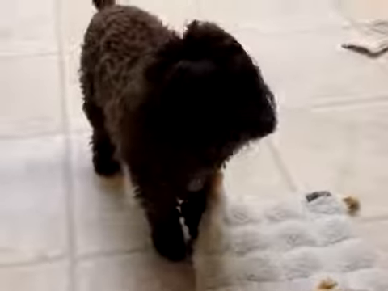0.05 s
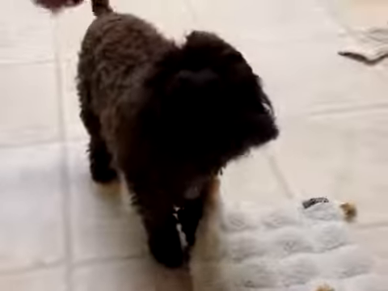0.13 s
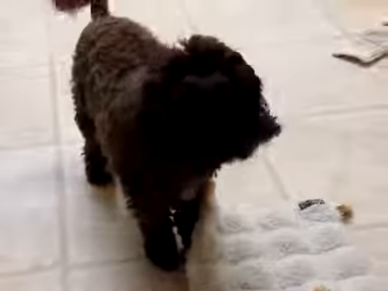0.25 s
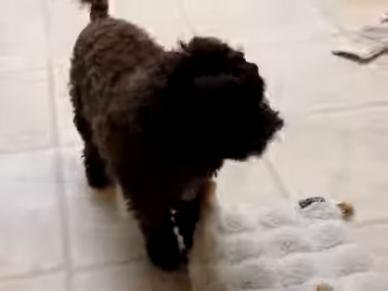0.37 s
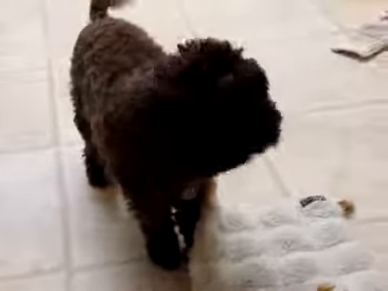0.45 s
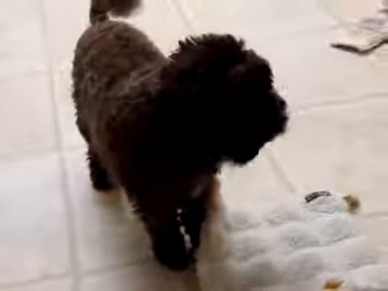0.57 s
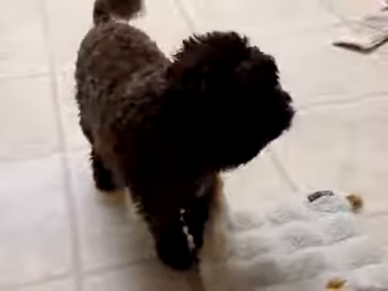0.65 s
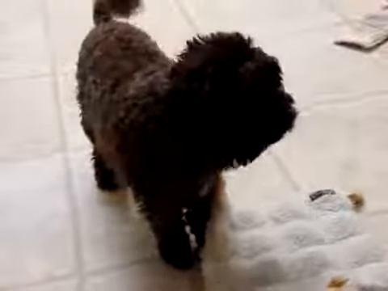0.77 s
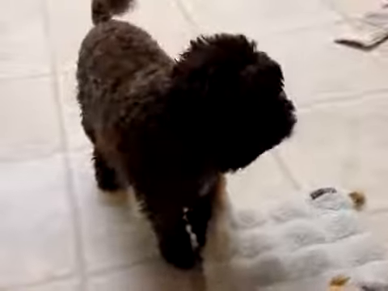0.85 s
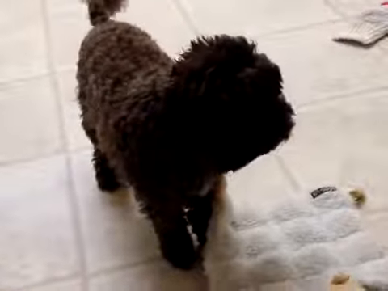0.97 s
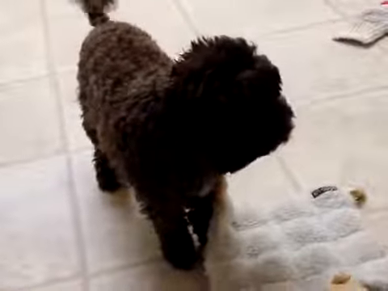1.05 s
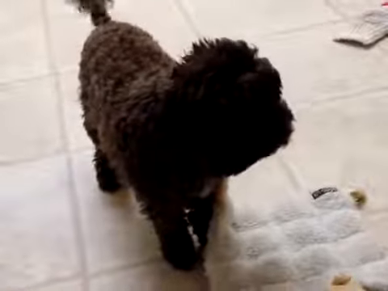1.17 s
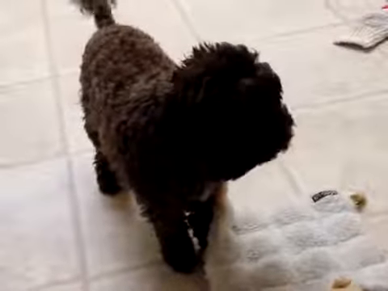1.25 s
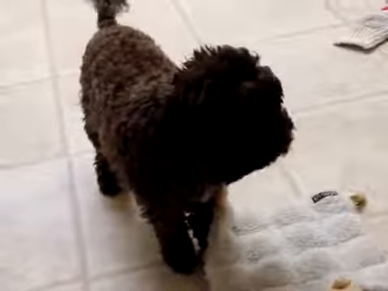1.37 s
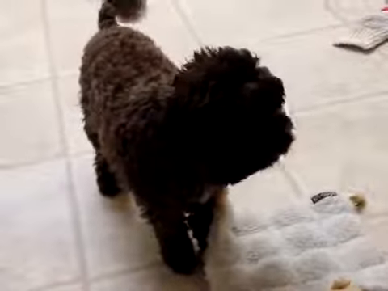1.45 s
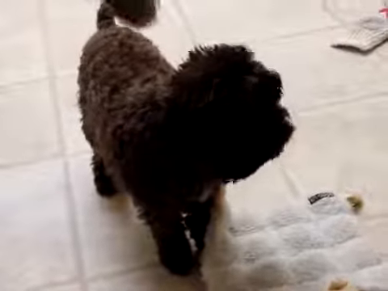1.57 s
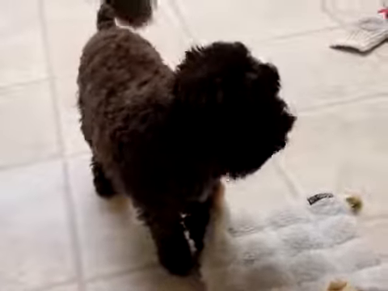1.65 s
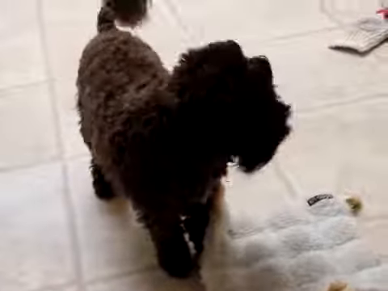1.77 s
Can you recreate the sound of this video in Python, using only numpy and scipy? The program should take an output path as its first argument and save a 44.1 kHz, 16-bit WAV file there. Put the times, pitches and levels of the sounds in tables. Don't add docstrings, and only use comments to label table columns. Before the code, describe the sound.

A small dog pounces on a hard tiled floor, paws thudding, claws knocking and a loose dish ringing, with sharp snaps close to the microphone.

```python
import sys
import numpy as np
from scipy import signal
from scipy.fft import rfft, irfft
from scipy.io import wavfile
from scipy.ndimage import uniform_filter1d

SR = 44100
rng = np.random.default_rng(int(sys.argv[2]) if len(sys.argv) > 2 else 0)


def amplitude_ratio(level_db):
    exponent = np.asarray(level_db, float) / 20
    return 10 ** exponent


def unload_audio(sound):
    columns = np.transpose(np.atleast_2d(sound))
    steps = np.round(np.clip(columns, -1, 1) * 32767)
    wavfile.write(sys.argv[1], SR, steps.astype(np.int16))


N = 288414


def at_hz(points, hz):
    point_hz, level_db = np.array(points)[:, 0], np.array(points)[:, 1]
    return np.interp(np.log(hz + 1), np.log(point_hz), level_db)


def colour(x, points):
    log_gain = at_hz(points, np.fft.rfftfreq(4096, 1 / SR)) * np.log(10) / 20
    cepstrum = irfft(log_gain)
    cepstrum[1:2048] *= 2
    cepstrum[2049:] = 0
    kernel = irfft(np.exp(rfft(cepstrum)))[:2048]
    return signal.fftconvolve(x, kernel / np.sqrt(np.sum(kernel ** 2)))[:N]


def noise(points):
    return colour(rng.standard_normal(N), points)


def marks(times, db):
    out = np.zeros(N)
    np.add.at(out, (np.asarray(times) * SR).astype(int), amplitude_ratio(db))
    return out


def ring(clicks, hz, t60):
    decay, turn = amplitude_ratio(-60 / (t60 * SR)), 2 * np.pi * hz / SR
    feedback = [1, -2 * decay * np.cos(turn), decay * decay]
    return signal.lfilter([0, np.sin(turn)], feedback, clicks + 1e-18)


def struck(times, db, modes, spread_db, swell_s):
    luck = rng.standard_normal((len(times), len(modes)))
    out = 0
    for k, (hz, level_db, t60) in enumerate(modes):
        clicks = marks(times, db + level_db + spread_db * luck[:, k])
        out = out + ring(clicks, hz, t60) - ring(clicks, hz, swell_s)
    return out


def waver(rate_hz, depth_db):
    points = rng.standard_normal(400)
    return amplitude_ratio(depth_db * np.interp(np.arange(N) / SR * rate_hz, np.arange(400), points))


# (pitch_hz [Hz], t60_s [s])
ROOM_DECAY = [(100, 0.66), (260, 0.45), (700, 0.37), (1840, 0.38), (4850, 0.37), (12000, 0.21)]


def room(x, build_s, clump_db):
    t = np.arange(30000) / SR
    edges = 50 * 2 ** np.arange(0, 8.6, .5)
    early = 1 + 0.42 * np.exp(-t / 0.012)
    walls = rng.standard_normal(120)
    echo = 0
    for low, high in zip(edges, edges[1:]):
        band_filter = signal.butter(2, [low, high], "band", fs=SR, output="sos")
        band = signal.sosfilt(band_filter, rng.standard_normal(len(t)))
        clumps = np.interp(t * 140, np.arange(120), .5 * walls + rng.standard_normal(120))
        t60 = at_hz(ROOM_DECAY, np.sqrt(low * high))
        echo = echo + band * amplitude_ratio(clump_db * clumps - 60 * t / t60) / np.sqrt(t60 * SR)
    return signal.fftconvolve(x, echo * (1 - np.exp(-t / build_s)) * early)[:N]


# (start_s [s], hiss_db while open [dB], hold_s [s], overshoot_db [dB])
OPENINGS = [(0.0, -53, 0.057, -3), (0.29, -50.5, 0.11, 9), (0.611, -58, 0.17, 10), (0.96, -55.5, 0.16, 2.5),
            (1.303, -51.5, 0.11, 15.5), (1.676, -55.5, 0.12, 3), (2.049, -56, 0.092, 2),
            (2.419, -54, 0.13, 0), (2.735, -51.5, 0.086, 7.5), (3.005, -51.5, 0.088, 11),
            (3.217, -51.5, 0.032, 13), (3.386, -62, 0.18, 1), (3.768, -58.5, 0.12, 2.5),
            (4.119, -53, 0.1, -10.5), (4.462, -51, 0.1, 10.5), (4.804, -62, 0.023, -1),
            (4.922, -63.5, 0.2, -2), (5.29, -51, 0.044, -4), (5.582, -52, .12, 0.5),
            (5.894, -53.5, 0.093, 7), (6.206, -55.5, 0.17, 3)]


def gate():
    overshoot_s, closing_db_per_s, ajar_db, sinking_db_per_s, shut_db = .02, 110, -11, 20, -73
    dip_db, dip_s = -2.5, 0.0052
    t = np.arange(N) / SR
    start_s, open_db, hold_s, over_db = np.transpose(OPENINGS)
    k = np.maximum(np.searchsorted(start_s, t, side="right") - 1, 0)
    since = t - start_s[k]
    after = np.maximum(since - hold_s[k], 0)
    closing = amplitude_ratio(-closing_db_per_s * after) + amplitude_ratio(ajar_db - sinking_db_per_s * after)
    closing_db = 20 * np.log10(closing / (1 + amplitude_ratio(ajar_db)))
    level = open_db[k] + over_db[k] * np.exp(-since / overshoot_s) + closing_db
    until = np.append(start_s[1:], 99)[k] - t
    return uniform_filter1d(np.maximum(level, shut_db) + dip_db * np.exp(-until / dip_s), size=130)


def mottle(x, depth_db):
    _, _, cells = signal.stft(x, nperseg=512)
    patches = uniform_filter1d(rng.standard_normal(cells.shape), size=3, axis=0)
    patches = uniform_filter1d(patches, size=5, axis=1)
    return signal.istft(cells * amplitude_ratio(depth_db * patches / patches.std()), nperseg=512)[1][:N]


# (pitch_hz [Hz], level_db [dB per Hz])
HUM = [(18, -47.5), (30, -7.5), (75, -9.5), (160, 5), (238, -8.5), (423, -1.5), (814, -7), (1060, -17.5),
       (1270, -9), (2710, -16.5), (9300, -27), (14500, -25.5), (15700, -27)]


def hiss():
    gate_db = gate()
    bright = [(300, -24.0), (1000, 8.0), (3000, 0), (9000, -1.0), (12000, -2), (14500, -0.5),
              (15700, 1.5), (16000, -52)]
    treble = amplitude_ratio(gate_db + 4) * noise(bright)
    hum = amplitude_ratio(0.96 * (gate_db + 60) - 54.0) * noise(HUM)
    return mottle(treble, depth_db=3.0) + hum


# (start_s [s], pad_db peak [dB], thud_db re pad [dB], claw_db re pad [dB], tip_db re pad [dB])
POUNCES = [(0.245, -8.5, -10.5, -19.5, -25), (0.295, -10, -8, 7.5, 4), (0.618, -7, -8.5, 1.5, -14),
           (0.908, -8.5, -8.5, -21, -21.5), (1.303, -14.5, -11, 1, -38), (1.344, -20, -2, -22, -2.5),
           (1.678, -11, -10.5, -14, -41), (2.051, -16, -6, -27, -42), (2.419, -38, 9.5, -1, -21),
           (3.007, -14, -10.5, -3, -20), (3.771, -53, -2, 4, -2), (3.849, -32, -8, -29, -3),
           (4.208, -27, -5.5, -33, -6), (4.462, -11.5, -9.5, -8, -28), (5.295, -24, -3, -19, -11),
           (5.588, -21, -8, -9.5, -23), (5.899, -10.5, -9.5, -1.5, -18), (6.212, -28.5, 2, -13, -6.5)]
# (start_s [s], pad_db peak [dB], thud_db re pad [dB])
STEPS = [(0.03, -24, -4), (1.074, -31, -17.5), (2.494, -26, -3.5), (2.635, -32, -1), (2.737, -25, 1),
         (2.861, -24.5, -6), (2.944, -28, -1.5), (3.486, -40, -28), (3.534, -44, 1), (4.125, -50, -5.5),
         (4.137, -24.5, -3.5), (4.933, -43, -4), (5.018, -36, -7.5), (5.328, -28.5, -6.5), (5.508, -25, -4),
         (5.658, -24.5, -4), (5.817, -28.5, -3.5), (6.123, -26, -3.5), (6.23, -19, -3.5),
         (6.349, -26, -14.5)]
# (pitch_hz [Hz], level_db [dB])
THUD = [(30, -45), (70, -30), (120, -6.5), (170, -5.5), (300, -0.5), (450, 7), (900, -36), (3000, -44),
        (10000, -65)]
PAD = [(200, -28.5), (420, 5.5), (650, 1.5), (1000, -5), (1500, -15.5), (3000, -53), (10000, -68)]
CLAW = [(700, -49.5), (1230, 3), (1500, -3), (1870, 7.5), (2100, -1), (2400, -2), (2900, -11),
        (3500, -20.5), (6000, -46)]
TIP = [(1800, -28), (2800, -8), (3600, 4.5), (5000, -10.5), (7000, -8.5), (11000, -27.5), (16000, -43.5)]
# (pitch_hz [Hz], level_db [dB], t60_s [s])
ROOM_MODES = [(115, -12, .5), (193, -9, .4), (259, 0, .45), (305, -2, .45), (525, -3, .4), (424, -5, .4),
              (650, -2, .35), (780, -5, .35), (826, -4, .35)]
# (pitch_hz [Hz], level_db [dB], t60_s [s])
TILE_MODES = [(1840, -2, 0.16), (1894, -2, 0.34), (2000, -4.5, 0.17), (2062, -7, 0.17)]


def blows():
    soft = [(*step, -27.5, -17.5) for step in STEPS]
    s, pad_db, thud_db, claw_db, tip_db = np.transpose(sorted(POUNCES + soft))
    s = s - .003
    contact = colour(marks(s, pad_db + 14.5), PAD)
    contact += colour(marks(s, pad_db + thud_db + 20), THUD)
    contact += colour(marks(s, pad_db + claw_db + 12.5), CLAW)
    contact += colour(marks(s, pad_db + tip_db + 5.5), TIP)
    standing = struck(s, pad_db + thud_db - 15, ROOM_MODES, spread_db=3.0, swell_s=.03)
    spot = np.searchsorted(s, np.arange(N) / SR + .002) % 3
    wet = sum(room(contact * (spot == k), build_s=.003, clump_db=1.6) for k in range(3))
    tile = struck(s, pad_db + claw_db - 18.5, TILE_MODES, spread_db=1.5, swell_s=.015)
    through_floor = [(30, -11), (70, -2.5), (130, -4.5), (220, -10.5), (500, -42.5)]
    thump = colour(marks(s, pad_db + thud_db + 1.5), through_floor)
    rumble_cut = signal.butter(4, 44, "high", fs=SR, output="sos")
    return signal.sosfilt(rumble_cut, thump + standing + tile + amplitude_ratio(15) * wet)


# (start_s [s], level_db of each of the four lower ring groups [dB])
RINGS = [(0.2924, -34, -48, -20, -29), (0.9737, -45, -32.5, -65, -55), (1.3037, -27, -24.5, -33.5, -39.5),
         (1.678, -35.5, -28, -41, -47.5), (2.0503, -50.5, -33, -50.5, -68),
         (2.4209, -62.5, -50, -50.5, -52.5), (3.0051, -32.5, -50.5, -39, -54.5),
         (3.7695, -61, -52.5, -59, -58), (4.4606, -25.5, -18.5, -56.5, -46.5),
         (5.897, -33, -38, -45.5, -51.5), (6.2123, -56.5, -39, -55, -43)]
# (pitch_hz [Hz], level_db [dB], t60_s [s])
DISH = [
    [(1229, 0, .5), (1241, -5, .38), (1270, -10, .25)],
    [(470, 0, .25), (382, -9, .3)],
    [(2252, 0, .4), (2262, -2, .4), (2390, -5, .15)],
    [(3527, 0, .36), (3545, -3, .3)],
    [(5911, 0, .2), (5980, -4, .15)],
]


def dish():
    s, *levels = np.transpose(RINGS)
    levels.append(levels[-1] - 3)
    out = 0
    for db, modes in zip(levels, DISH):
        out = out + struck(s, db - 1, modes, spread_db=.7, swell_s=.012) * waver(45, 2.5)
    return out


# (start_s [s], level_db peak [dB], pitch_hz [Hz])
TICKS = [
    (0.4456, -31, 4600),
    (0.845, -43, 6100),
    (1.5844, -39, 5750),
    (1.9492, -30, 5560),
    (2.151, -39, 5660),
    (2.5785, -32.5, 7050),
    (3.3933, -49, 6440),
    (3.418, -53, 5800),
    (5.687, -29.5, 5850),
    (6.2218, -29.5, 5840),
]
# (start_s [s], level_db peak [dB], pitch_hz [Hz])
TAPS = [
    (0.7815, -33, 6060),
    (0.782, -25, 2900),
    (0.782, -29, 4500),
    (1.615, -36.5, 2500),
    (2.7658, -21, 7600),
    (4.209, -31, 3120),
    (4.706, -41, 330),
    (4.747, -44, 4040),
    (4.945, -35, 1600),
]


def ticks():
    s, db, hz = np.transpose(TICKS + TAPS + drive())
    broad = [(1500, -17), (2600, 4), (4000, 7), (5600, -15), (8000, -11), (14000, -10.5), (16000, -6)]
    out = colour(marks(s, db + 3.5 - 20 * (hz < 2000)), broad)
    t = np.arange(600) / SR
    for at, gain, pitch in zip((s * SR).astype(int), amplitude_ratio(db + 7.5), hz):
        life = .00012 + .6 / pitch
        out[at:at + 600] += gain * np.sin(2 * np.pi * pitch * t) * t / life * np.exp(-t / life)
    return out


# (start_s [s], strong_ticks [count], level_db [dB], loss_db [dB per strong tick])
DRIVE_RUNS = [
    (1.015, 4, -35, -.4),
    (4.585, 5, -33, 1.2),
]


def drive():
    period_s, offbeat_s, pitch_hz, weak_db = .1335, .0655, 5600, -46.5
    strong, weak = [], []
    for s, count, db, loss_db in DRIVE_RUNS:
        for k in range(round(count)):
            strong.append((s + k * period_s, db - k * loss_db, pitch_hz))
            if k < round(count) - 1:
                weak.append((s + k * period_s + offbeat_s, weak_db, pitch_hz))
    return strong + weak


# (start_s [s], level_db peak [dB], length_s [s], body_db re peak [dB])
SNAPS = [(2.7613, -28, 0.0033, -26), (3.2062, -29.5, 0.0056, -27), (3.209, -2.5, 0.0015, -13),
         (3.212, 1, 0.0023, -1), (3.2136, 4.5, 0.0033, -7.5), (3.217, -1, 0.0023, -30),
         (3.218, -12.5, 0.0024, -13), (6.5043, -36.5, 0.0052, -18), (6.5074, -14.5, .002, -4),
         (6.509, -0.5, 0.0049, -5), (6.5115, -3, 0.0026, -3), (6.5131, -24.5, 0.0098, -3)]
# (pitch_hz [Hz], level_db [dB per Hz])
SNAP = [(120, -58), (200, -28.5), (943, -3), (1270, -15.5), (1580, 0.5), (2250, -16.5), (3560, -23.5),
        (4620, -13.5), (6430, -12.5), (10600, -5.5), (16500, -35)]
LAST_SNAP = [(120, -57), (200, -44.5), (742, -12), (1130, -27), (1700, 2), (2500, -20.5), (3770, -25),
             (4530, -12.5), (8810, -17), (12300, -14), (14800, -21.5), (16500, -54)]
# (pitch_hz [Hz], level_db [dB], t60_s [s])
SNAP_MODES = [(900, -7, .22), (1541, 3, .4), (1585, -2, .34), (1696, -10, .2), (4549, -12, .3),
              (4660, -9, .3), (4440, -11, .26), (4760, -13, .25), (7063, -17, .2), (10900, -14, .17)]
LAST_SNAP_MODES = [(745, -11, .1), (1690, 0, .2), (1760, -4, .15), (4600, -22, .15), (7400, -20, .12)]


def snaps():
    t = np.arange(N) / SR
    force = 0
    for s, db, length, _ in SNAPS:
        force = force + amplitude_ratio(db) * (t > s) * np.exp(-np.maximum(t - s, 0) / (0.61 * length))
    force = force * rng.standard_normal(N)
    crack = amplitude_ratio(-0.5) * (colour(force * (t < 5), SNAP) + colour(force * (t >= 5), LAST_SNAP))
    s, db, _, body_db = np.transpose(SNAPS)
    hit_db, first, last = db + body_db, s < 5, s > 5
    body = struck(s[first], hit_db[first] - 31, SNAP_MODES, spread_db=1.0, swell_s=.06) * waver(58, 4.0)
    body += struck(s[last], hit_db[last] - 25, LAST_SNAP_MODES, spread_db=1.0, swell_s=.012)
    answer = [(300, 2.5), (1600, 2.5), (2900, -8.5), (4500, -2), (12000, -1.5)]
    tail = amplitude_ratio(-11) * room(colour(crack, answer) + 2.5 * body, build_s=0.008, clump_db=0.0)
    return crack + amplitude_ratio(-2.5) * body + tail


# (start_s [s], level_db peak [dB])
CRACKLES = [
    (3.3925, -30),
    (3.394, -33),
    (3.413, -35),
    (3.4155, -37),
    (3.4185, -31),
    (3.437, -38),
    (3.444, -40),
]
# (pitch_hz [Hz], level_db [dB])
CRACKLE = [(3000, -30), (6000, -8), (10000, -5), (14500, 0), (16800, -6)]


def crackles():
    s, db = np.transpose(CRACKLES)
    return colour(marks(s, db + 7.0), CRACKLE)


# (start_s [s], length_s [s], level_db [dB])
SCUFFS = [
    (4.81, 0.1, -46.5),
    (16, 0.1, -59),
    (4.6, 0.071, -56),
]


def scuffs():
    t = np.arange(N) / SR
    stroke = 0
    for s, length, db in SCUFFS:
        stroke = stroke + amplitude_ratio(db) * np.sin(np.pi * np.clip((t - s) / length, 0, 1) ** 0.41)
    return stroke * noise([(1500, -19.5), (2500, -10), (6000, -5.5), (9000, -12.5), (15000, -16.0)])


FLINCHES = [
    3.2255,
    6.5245,
]


def scene():
    t = np.arange(N) / SR
    flinch_s, flinch_share = .0025, .8
    flinch = 1 - flinch_share * sum(np.exp(-((t - s) / flinch_s) ** 2) for s in FLINCHES)
    sources = hiss() + blows() + dish() + ticks() + snaps() + crackles() + scuffs()
    return (flinch * sources)[None]


def low_pass(x):
    return signal.sosfilt(signal.butter(12, 16990, fs=SR, output="sos"), x)


def record(dry):
    rounded = .66 * np.tanh(dry / .66)
    top_cut = signal.cheby2(12, 70, 17000, fs=SR, output="sos")
    mix = signal.sosfilt(top_cut, rounded)
    return low_pass(mix)


dry = scene()
out = record(dry)
unload_audio(out)
```